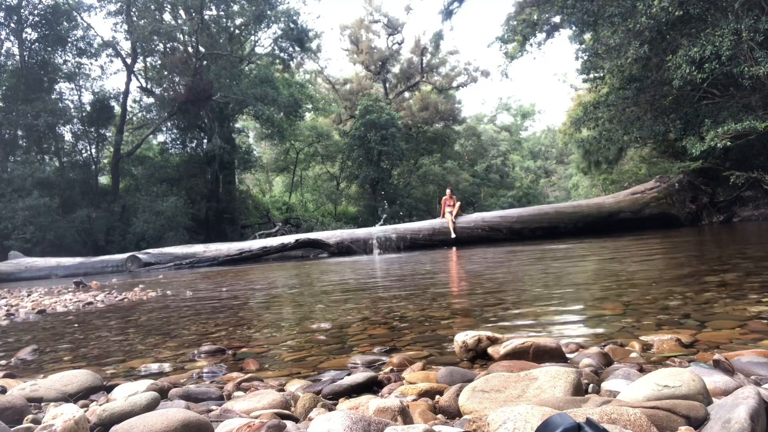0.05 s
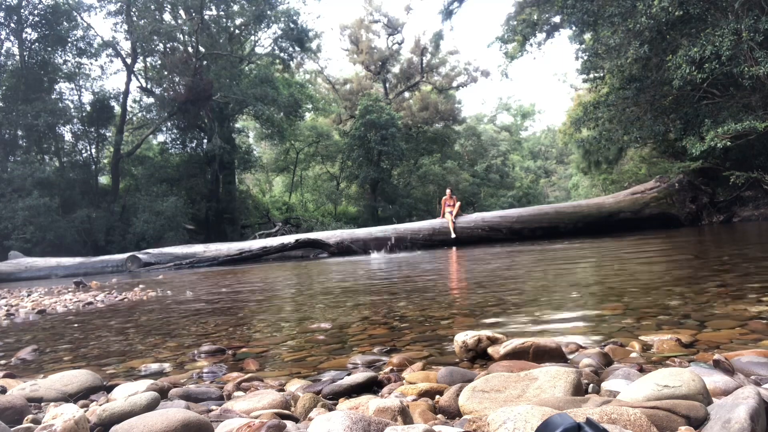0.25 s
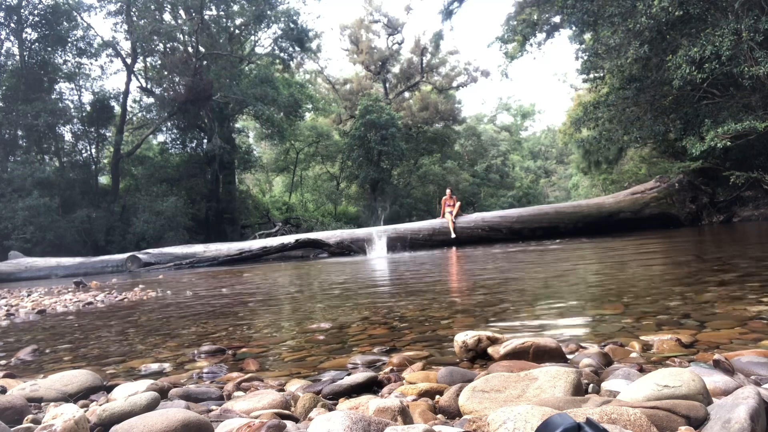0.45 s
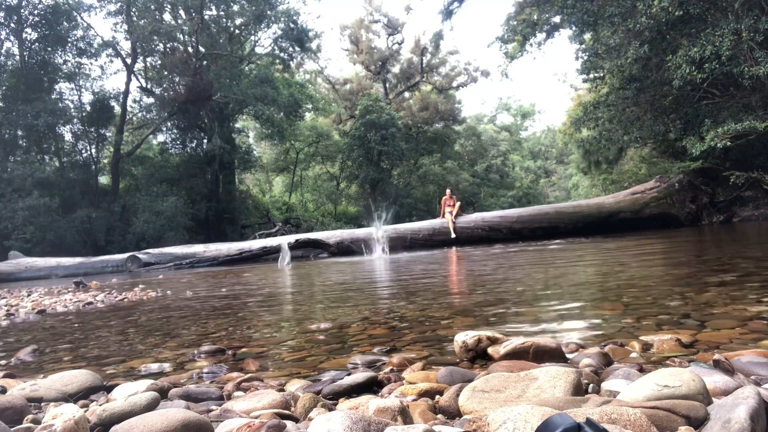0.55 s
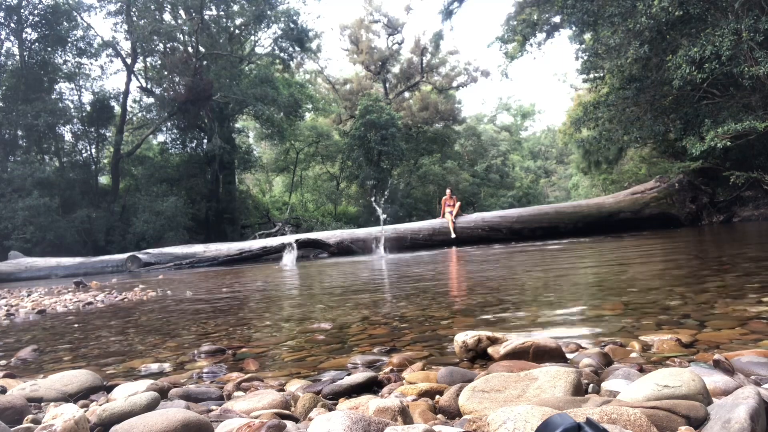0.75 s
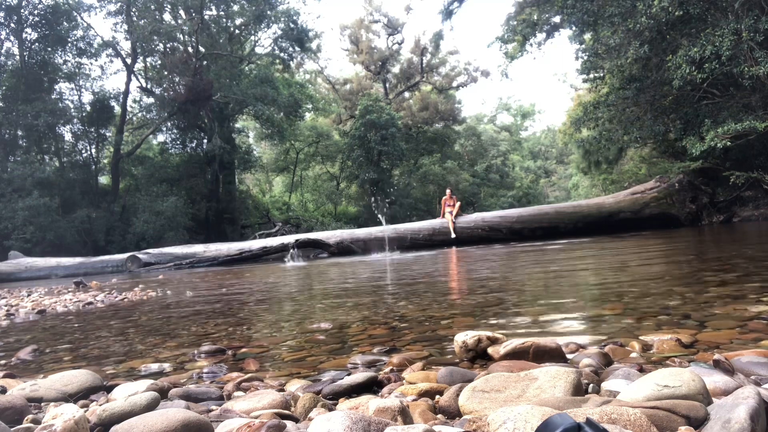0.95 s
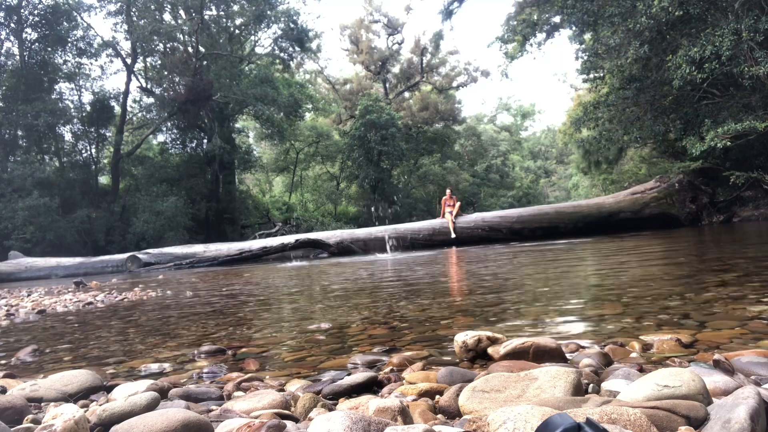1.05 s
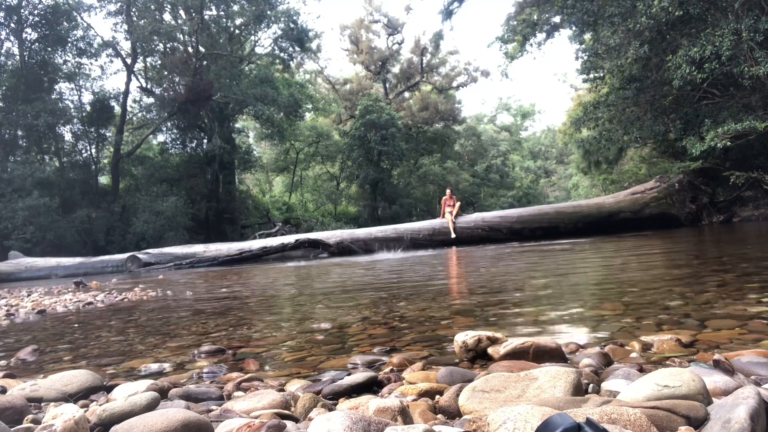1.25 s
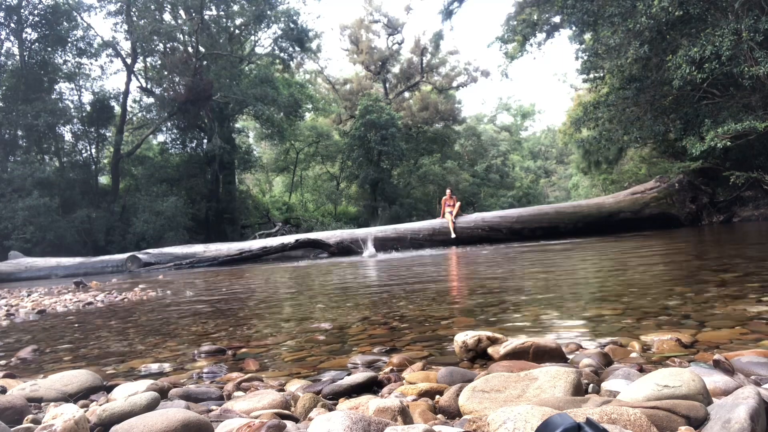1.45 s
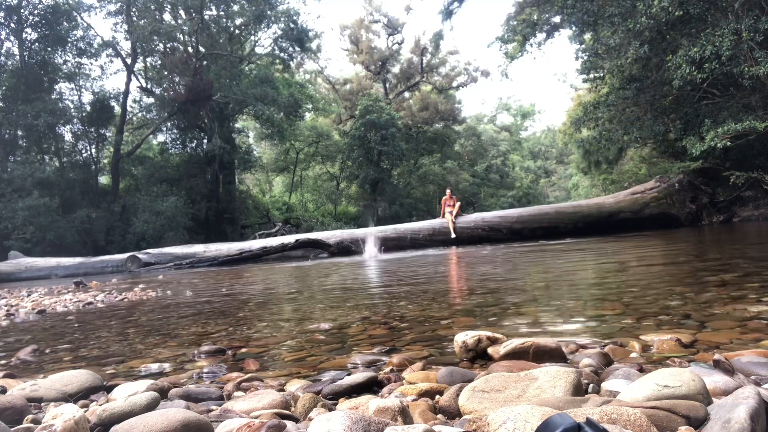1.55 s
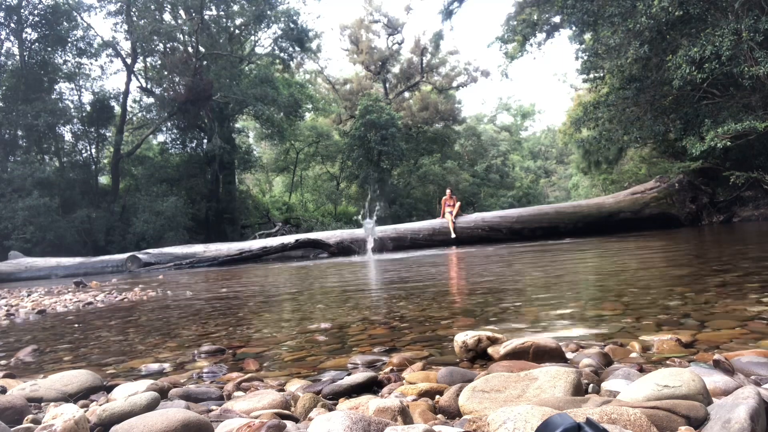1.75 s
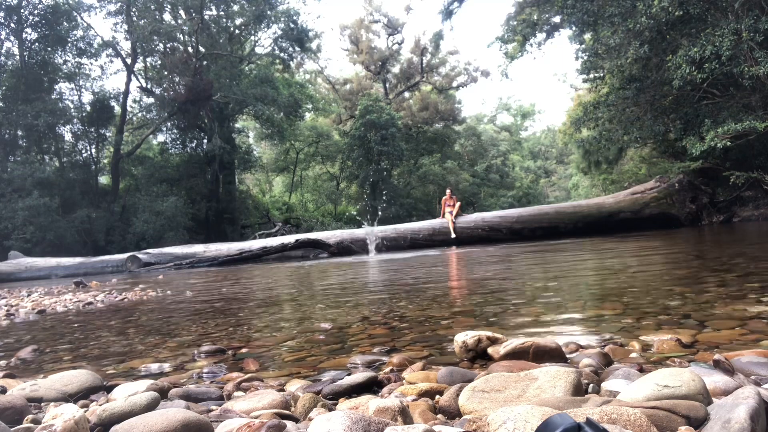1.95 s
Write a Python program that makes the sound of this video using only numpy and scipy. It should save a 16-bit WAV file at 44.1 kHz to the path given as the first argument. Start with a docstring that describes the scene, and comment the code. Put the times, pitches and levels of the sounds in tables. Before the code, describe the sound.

Stones splash into a gently flowing forest river twice, each with a hollow plop and drips.

```python
"""A shallow forest river, some metres from a pebble bank: two stones drop in.
Each slaps the surface and opens a ringing air cavity, which pinches off into bubbles about 55 ms later.
Low hollow tones ring on after each slap. Thrown-up water patters back and sharp drops tick.
Bank and trees echo the splashes over a soft current and a faint low hum."""
import sys
import numpy as np
from scipy import signal
from scipy.fft import rfft, irfft
from scipy.io import wavfile

SR = 44100
rng = np.random.default_rng(int(sys.argv[2]) if len(sys.argv) > 2 else 0)


def output_pcm(signal):
    """Save a mono or channel-first signal as 16-bit PCM at the path in sys.argv[1].

    Samples are clipped to [-1, 1] before scaling.
    """
    pcm = np.clip(np.atleast_2d(signal).T, -1, 1) * 32767
    wavfile.write(sys.argv[1], SR, np.round(pcm).astype(np.int16))


N = 88200

# Spectrum of fizz and tiny bubbles. Each row: frequency in Hz, level in dB.
FIZZ_SPECTRUM = [(1000, -19), (2000, 1), (3400, 6.5), (5000, 4.5), (7500, -3.5), (9000, -21.5), (16000, -3)]
BUBBLE_RANGE_HZ, SPECK_RANGE_HZ = (220, 2600), (2200, 8500)


def undb(db):
    """Decibels to gain."""
    return 10 ** (np.asarray(db) / 20)


def unit(x):
    """Scale to rms 1."""
    return x / np.sqrt(np.mean(x ** 2))


def since(start_s):
    """Seconds since the start, zero before it."""
    return np.maximum(np.arange(N) / SR - start_s, 0)


def strike(t, attack_s, t60_s):
    """Quick swell, exponential fade."""
    return (1 - np.exp(-t / attack_s)) * np.exp(-np.log(1000) * t / t60_s)


def swell(peak_s, rise_s, fall_s):
    """Gaussian hump with separate rise and fall."""
    t = np.arange(N) / SR - peak_s
    return np.exp(-(t / np.where(t < 0, rise_s, fall_s)) ** 2)


def colour(x, spectrum):
    """Minimum-phase filter through (Hz, dB) points; white noise keeps its power."""
    hz, db = np.array(spectrum).T
    bins_hz = np.arange(N + 1) * SR / (2 * N)
    gain = unit(undb(np.interp(np.log(bins_hz + 1), np.log(hz), db)))
    cepstrum = irfft(np.log(gain))
    fold = np.r_[1, np.full(N - 1, 2), 1, np.zeros(N - 1)]
    return irfft(rfft(x, 2 * N) * np.exp(rfft(cepstrum * fold)))[:N]


def noise(spectrum):
    """Coloured noise, rms 1."""
    return unit(colour(rng.standard_normal(N), spectrum))


def low_cut(x, hz, order):
    """Butterworth high-pass."""
    return signal.sosfilt(signal.butter(order, hz, "high", fs=SR, output="sos"), x)


def resonate(x, hz, q):
    """Band-pass, rms 1."""
    return unit(signal.lfilter(*signal.iirpeak(hz, q, fs=SR), x))


def rising_ring(t, hz, t60_s):
    """Damped tone rising 3.1 % in pitch per t60, as a bubble does near the surface."""
    cycles = hz * t * (1 + 0.031 * t / t60_s / 2)
    return strike(t, 0.42 / hz, t60_s) * np.sin(2 * np.pi * cycles)


def bubbling(per_s, range_hz, spectrum, spread_db):
    """A crowd of small bubbles of random size, rms 1."""
    out = np.zeros(N)
    draws = np.random.default_rng(rng.integers(2 ** 31)).random((int(per_s * N / SR), 4))
    for when, pitch, strength, life in draws:
        hz = range_hz[0] * (range_hz[1] / range_hz[0]) ** pitch
        t60_s = 15.3 * (.5 + life) / hz
        gain = hz * undb(spread_db * min(-np.log(1 - strength), 3))
        start = int(when * N)
        t = np.arange(min(int(t60_s * SR), N - start)) / SR
        out[start:start + len(t)] += gain * rising_ring(t, hz, t60_s)
    return unit(colour(out, spectrum))


def ticks(per_s, spectrum, spread_db):
    """Dense tiny droplet impacts, rms 1."""
    sizes = undb(spread_db * np.minimum(rng.exponential(size=N), 4))
    signs = np.sign(rng.standard_normal(N))
    hits = rng.random(N) < per_s / SR
    return unit(colour(sizes * signs * hits, spectrum))


def river():
    """The current's soft wash, with ripples and tiny bubbles bursting among the pebbles."""
    # Each row: time in seconds, level in dB.
    flow_levels = [(0, -62), (0.3, -56.5), (0.72, -57.5), (1.25, -58), (1.55, -58.5), (1.85, -63), (2, -62)]
    # Each row: frequency in Hz, level in dB.
    wash_spectrum = [(25, -64), (55, -9), (110, -4.5), (180, -5), (350, -9), (600, 1), (1100, -3.5),
                     (1700, -8.5), (2500, -12), (4200, -10.5), (7000, -18), (9000, -25.5), (16000, -26)]
    ripple_spectrum = [(150, -7.5), (300, -8), (700, -6.5), (1200, -6), (1700, -9), (2600, -21.5)]
    flow = undb(np.interp(since(0), *np.array(flow_levels).T))
    ripples = bubbling(800, BUBBLE_RANGE_HZ, ripple_spectrum, spread_db=4)
    trickle = bubbling(170, SPECK_RANGE_HZ, FIZZ_SPECTRUM, spread_db=5.5)
    return flow * (noise(wash_spectrum) + undb(-1) * ripples + undb(-8) * trickle)


def spray():
    """Thrown-up water falls back in showers that bubble and fizz, under a fine treble crackle."""
    # Each row: peak, rise and fall in seconds, bubble pitch in Hz, bubbling and fizz levels in dB.
    showers = [(0.08, 0.059, 0.17, 970, -51, -64), (0.46, 0.081, 0.1, 740, -49.5, -59.5),
               (0.874, 0.032, 0.033, 840, -48, -59), (0.961, 0.083, .05, 1100, -48.5, -58.5),
               (1.069, 0.067, 0.087, 1300, -50, -58.5), (1.609, 0.05, 0.12, 735, -51, -62.5),
               (1.99, 0.037, .05, 930, -47, -57.5)]
    # Each row: time in seconds, level in dB.
    crackle_levels = [(0, -76), (0.14, -63.5), (0.21, -57), (0.4, -64.5), (0.52, -68), (0.68, -72),
                      (0.86, -65), (1.05, -61.5), (1.22, -65.5), (1.42, -65), (1.599, -71), (1.852, -83.5),
                      (2, -65)]
    # Each row: frequency in Hz, level in dB.
    crowd_spectrum = [(150, -13.5), (260, -8), (450, -2.5), (750, -6), (1150, -4.5), (1500, -6),
                      (2100, -10.5), (3500, -21.5)]
    crackle_spectrum = [(3000, -19), (7000, -10), (10000, -14.5), (15500, -31)]
    crowd = bubbling(2200, BUBBLE_RANGE_HZ, crowd_spectrum, spread_db=4)
    droplets = ticks(3000, FIZZ_SPECTRUM, spread_db=8)
    specks = bubbling(220, SPECK_RANGE_HZ, FIZZ_SPECTRUM, spread_db=5.5)
    fizz = unit(droplets + specks)
    crackle_gain = undb(np.interp(since(0), *np.array(crackle_levels).T))
    out = crackle_gain * ticks(1900, crackle_spectrum, spread_db=4.5)
    for peak_s, rise_s, fall_s, hz, bubble_db, fizz_db in showers:
        bubbles = unit(resonate(crowd, hz, q=1.56) + undb(-3) * crowd)
        out += swell(peak_s, rise_s, fall_s) * (undb(bubble_db) * bubbles + undb(fizz_db) * fizz)
    return out


def drops():
    """Sharp single drops: a bright tick over a duller splat."""
    # Each row: start in seconds, pitch in Hz, level in dB, t60 in seconds.
    impacts = [(0.037, 4730, -50.5, 0.015), (0.086, 3330, -48.5, 0.031), (0.109, 3370, -45, 0.032),
               (0.1815, 8000, -39.5, 0.051), (0.3893, 10900, -48, 0.054), (0.4415, 4640, -31.5, .024),
               (0.4818, 9200, -35.5, 0.0071), (1.0496, 3520, -36, 0.0087), (1.1215, 5220, -39.5, 0.0077),
               (1.2555, 4220, -39.5, 0.015), (1.2732, 6800, -36.5, 0.0049), (1.279, 6300, -34, 0.015),
               (1.4719, 4200, -48, 0.01), (1.6000, 5270, -48.5, 0.021), (1.6850, 4400, -47, 0.015),
               (1.713, 5940, -50, 0.012), (1.9070, 3750, -52.5, 0.013), (1.9455, 4550, -50.5, 0.02)]
    # Each row: frequency in Hz, level in dB.
    splat_spectrum = [(500, -41), (1300, -10.5), (2500, -14.5), (4000, -8), (8000, -31), (16000, -63)]
    out, splat_noise = np.zeros(N), noise(splat_spectrum)
    for start_s, hz, db, t60_s in impacts:
        t = since(start_s)
        band = resonate(rng.standard_normal(N), hz, q=2.75)
        ring = undb(-2) * np.sin(2 * np.pi * hz * t)
        tick = strike(t, 0.00044, t60_s) * (band + ring)
        splat = undb(-4) * strike(t, 0.00028, 1.5 * t60_s) * splat_noise
        out += undb(db) * (tick + splat)
    return out


def plips():
    """Falling water rings lone bubbles."""
    # Each row: start in seconds, pitch in Hz, level in dB.
    bubbles = [(0.038, 1080, -40.5), (0.09, 404, -40.5), (0.156, 1330, -40), (0.186, 173, -43.5),
               (0.193, 423, -40), (0.8521, 970, -41), (0.889, 262, -44), (0.899, 1220, -35),
               (0.95, 1080, -38), (1.031, 668, -36), (1.041, 1160, -30.5), (1.069, 1275, -30.5),
               (1.203, 1130, -45), (1.255, 1280, -35.5), (1.305, 364, -42), (1.857, 900, -42),
               (1.961, 824, -40.5), (1.981, 1370, -31.5), (1.985, 860, -32.5)]
    return sum(undb(db) * rising_ring(since(start_s), hz, t60_s=21 / hz) for start_s, hz, db in bubbles)


def hum():
    """A faint low tone swells twice."""
    # Each row: peak, rise and fall in seconds, level in dB.
    swells = [(0.16, .05, 0.25, -65), (1.25, .06, 0.22, -67.5)]
    hz = 103.3
    envelope = sum(undb(db) * swell(peak_s, rise_s, fall_s) for peak_s, rise_s, fall_s, db in swells)
    return envelope * unit(np.sin(2 * np.pi * hz * since(0)))


def cavity(t, settled_hz, t60_s):
    """An air cavity rings; its pitch drops as it deepens."""
    start_hz, settle_s = 1940, 0.00077
    cycles = settled_hz * t + (start_hz - settled_hz) * settle_s * (1 - np.exp(-t / settle_s))
    return strike(t, 0.00046, t60_s) * np.sin(2 * np.pi * cycles)


def stones():
    """Each stone opens a cavity with a slap, hollowed by a quick inverted reflection."""
    # Each row: start in seconds, settled cavity pitch in Hz, ring level in dB, ring t60 in seconds,
    # slap level in dB, slap t60 in seconds, slap low edge in Hz.
    entries = [(0.2362, 590.6, -12, 0.064, -15.5, .026, 214),
               (1.338, 1027, -17.5, 0.035, -25.5, 0.042, 780)]
    # Each row: frequency in Hz, level in dB.
    slap_spectrum = [(100, 2), (260, -0.5), (450, 14), (950, -6), (1700, 10), (2700, -6.5), (4200, -1),
                     (5500, -7), (7200, -18.5), (9500, -29), (16000, -38)]
    reflection_s = 0.0022
    out, slap_noise = np.zeros(N), noise(slap_spectrum)
    for start_s, hz, ring_db, ring_t60_s, slap_db, slap_t60_s, edge_hz in entries:
        t = since(start_s)
        slap = strike(t, 0.000067, slap_t60_s) * low_cut(slap_noise, edge_hz, order=3)
        reflection = undb(-14.5) * np.interp(since(reflection_s), since(0), slap)
        out += undb(slap_db) * (slap - reflection)
        out += undb(ring_db) * cavity(t, hz, ring_t60_s)
    return out


def tones_and_gulps():
    """Low hollow tones ring on after each slap, then bubbles gulp as the cavity closes."""
    # Each row: start in seconds, pitch in Hz, level in dB, t60 in seconds.
    rings = [(0.2375, 269, -30, 0.045), (0.2520, 569, -34.5, 0.15), (0.2968, 698, -20.5, 0.025),
             (0.2976, 1220, -29.5, .035), (0.3015, 840, -16.5, 0.017), (0.3025, 265, -26, 0.045),
             (1.3400, 594, -38.5, 0.2), (1.3880, 1320, -29.5, 0.02), (1.3885, 780, -27.5, 0.027),
             (1.3902, 265.3, -19, 0.083), (1.3926, 171.7, -25.5, 0.084), (1.4350, 281, -44, 0.39)]
    return sum(undb(db) * rising_ring(since(start_s), hz, t60_s) for start_s, hz, db, t60_s in rings)


def tearing():
    """The water sheet tears as a cavity closes."""
    # Each row: start in seconds, level in dB, t60 in seconds.
    tears = [(0.2546, -35, 0.054), (0.2999, -36, 0.074), (1.3467, -31, 0.05), (1.3865, -40.5, 0.083)]
    # Each row: frequency in Hz, level in dB.
    tear_spectrum = [(200, -29.5), (700, -0.5), (1500, -3.5), (2500, -5), (4500, -12), (7500, -14),
                     (10000, -27), (16000, -32)]
    envelope = sum(undb(db) * strike(since(start_s), 0.00018, t60_s) for start_s, db, t60_s in tears)
    return envelope * noise(tear_spectrum)


def forest(x):
    """Quick scatter from the near bank, longer thin echo from the trees."""
    # Each row: frequency in Hz, level in dB.
    echo_spectrum = [(100, 1.5), (270, 1), (420, 0.5), (620, -7), (1100, -7), (2200, -7.5), (4500, -3.5),
                     (8000, -13.5), (16000, -0.5)]
    response = np.zeros(N)
    for db, build_s, t60_s in ((-15, .008, 0.36), (-19.5, .04, 0.55)):  # bank, trees
        tail = rng.standard_normal(N) * strike(since(0), build_s, t60_s)
        response += undb(db) * unit(tail) / np.sqrt(N)
    return signal.fftconvolve(x, colour(response, echo_spectrum))[:N]


def scene():
    """Splashes, which radiate little bass, and their echo over river and hum."""
    splashes = stones() + tones_and_gulps() + tearing() + drops() + plips() + spray()
    splashes = low_cut(splashes, hz=172, order=4)
    return (splashes + forest(splashes) + river() + hum())[None]


def record(dry):
    """Steep low-pass at 16 kHz."""
    return signal.sosfilt(signal.ellip(10, .2, 70, 16000, fs=SR, output="sos"), dry)


dry = scene()
out = record(dry)
output_pcm(out)
```